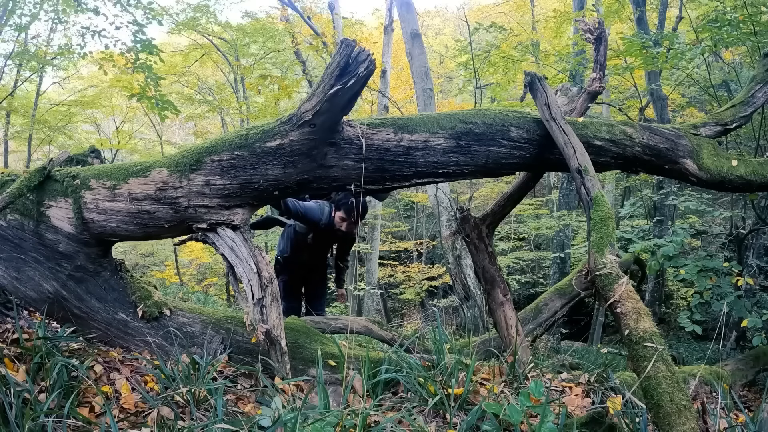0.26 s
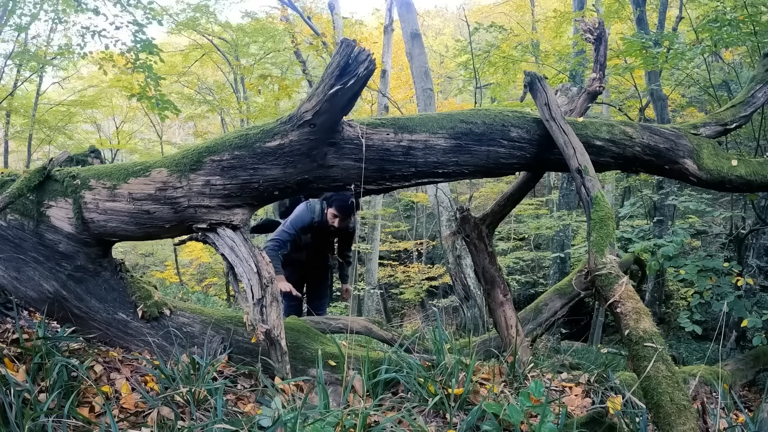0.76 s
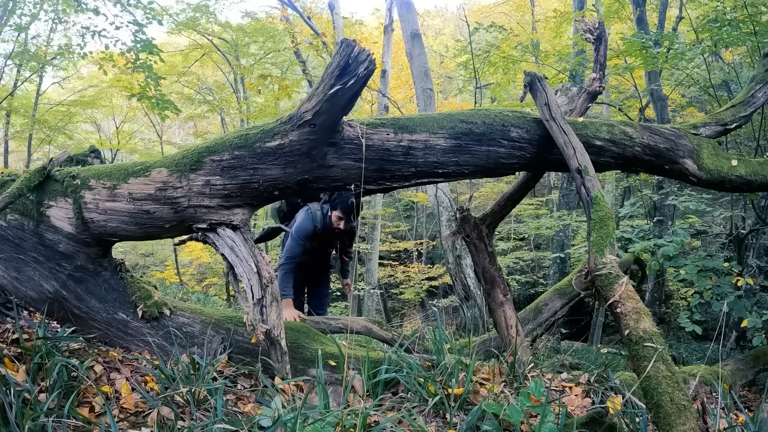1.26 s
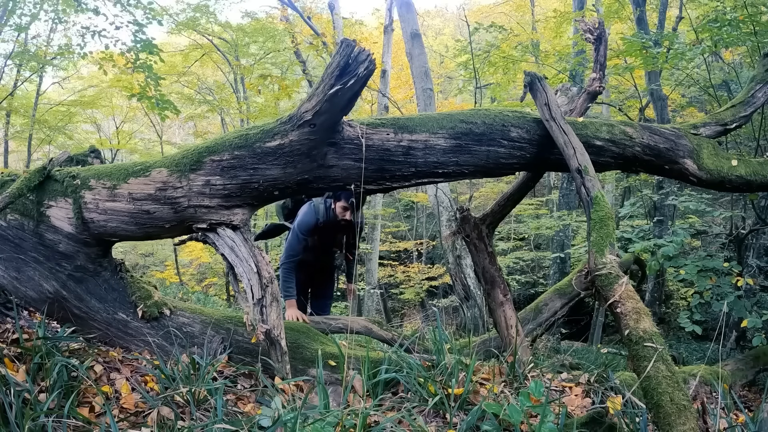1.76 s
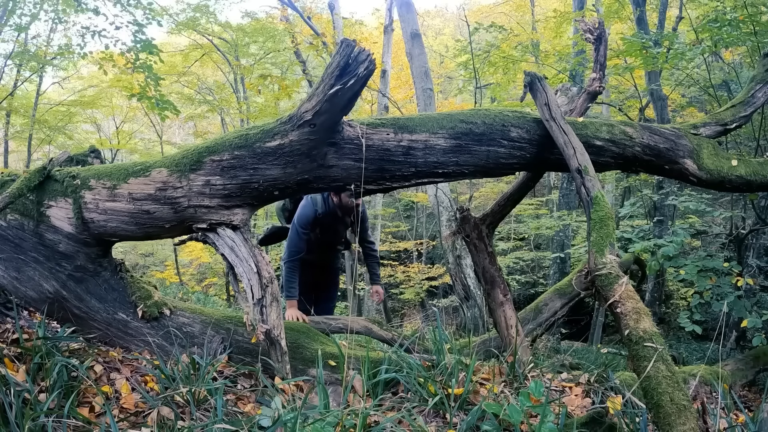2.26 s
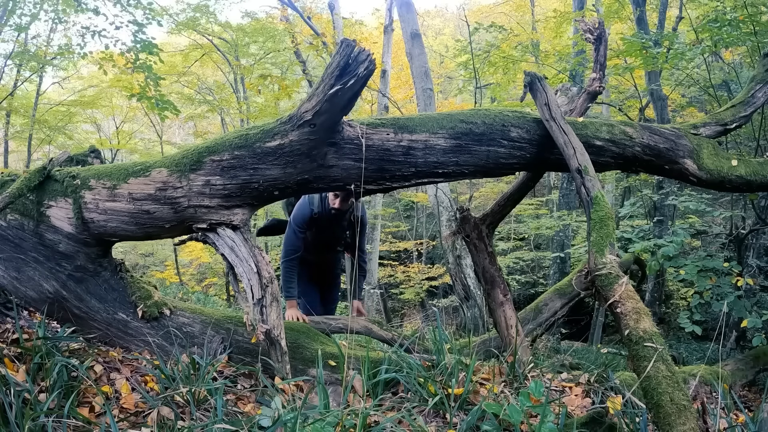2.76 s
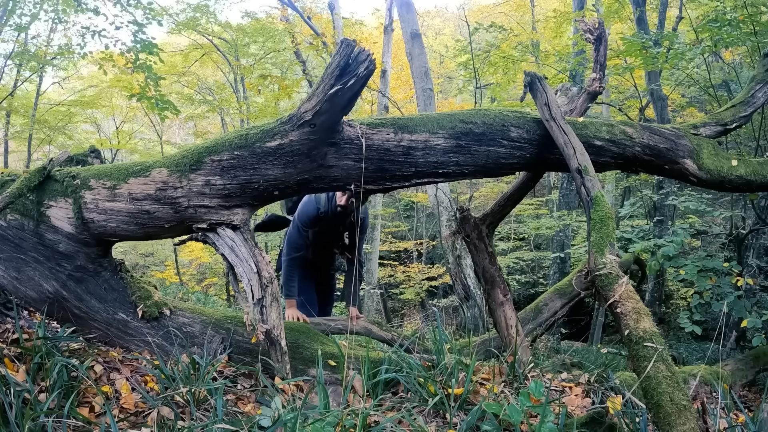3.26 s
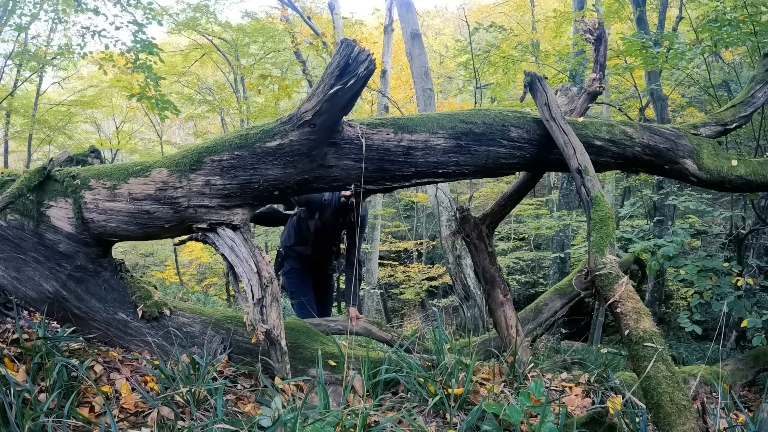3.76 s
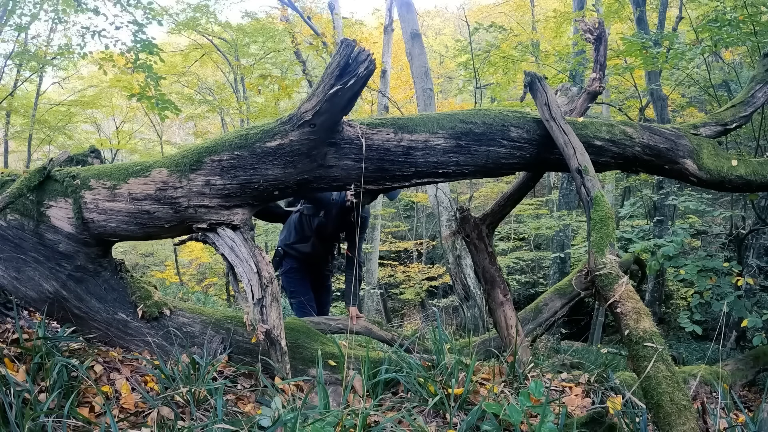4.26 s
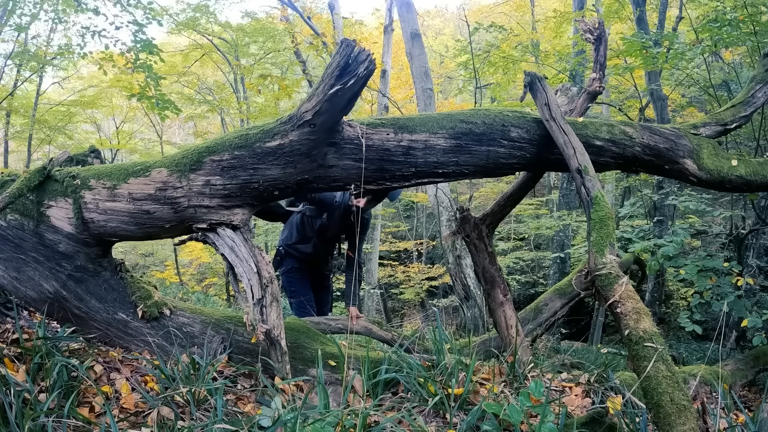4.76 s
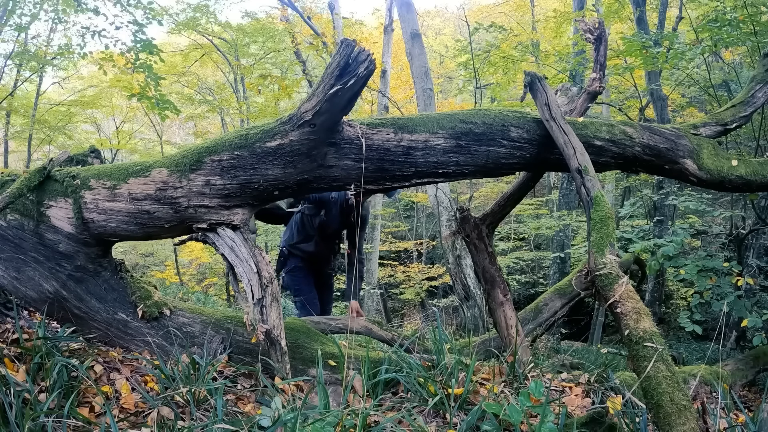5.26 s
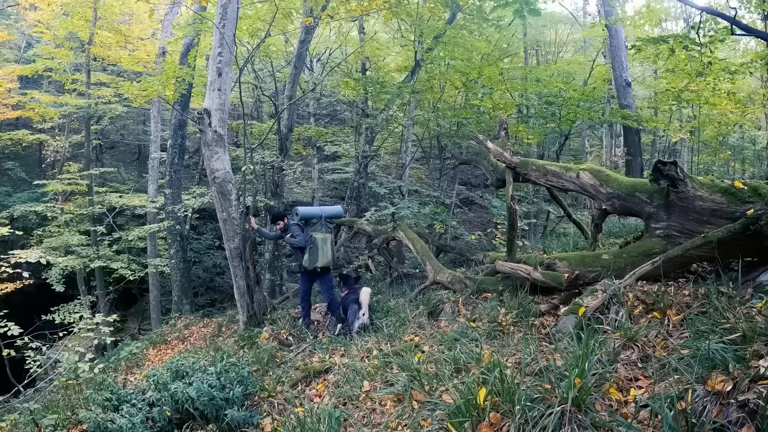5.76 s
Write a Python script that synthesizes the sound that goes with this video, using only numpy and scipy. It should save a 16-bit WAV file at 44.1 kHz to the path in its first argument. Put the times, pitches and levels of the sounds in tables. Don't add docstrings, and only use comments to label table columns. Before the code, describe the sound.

Quiet forest, stereo microphone at a small distance. A hand pats a big fallen trunk: one faint knock and two firmer ones on a stub, then rustling dry leaves and crunching steps, then four heavier, hollow slaps on the thick trunk, the last sharpest. Afterwards, more litter and twig snaps under foot as the leaf hiss rises slightly.

```python
import sys
import numpy as np
from scipy import signal
from scipy.fft import rfft, irfft, next_fast_len
from scipy.io import wavfile
from scipy.ndimage import uniform_filter1d, map_coordinates

SR = 44100
rng = np.random.default_rng(int(sys.argv[2]) if len(sys.argv) > 2 else 0)


def invert_db(level):
    return 10 ** (np.asarray(level, dtype=float) / 20)


def file_out(sig):
    cols = np.atleast_2d(sig).T
    lim = np.clip(cols, -1, 1)
    pcm = np.round(lim * 32767).astype(np.int16)
    wavfile.write(sys.argv[1], SR, pcm)


N = 264600
LEFT_RIGHT = np.array([[1], [-1]])


def unit(x):
    return x / np.sqrt(np.mean(x ** 2) + 1e-20)


def along(points, hz):
    f, v = np.transpose(points)
    return np.interp(np.log(hz + 1), np.log(f + 1), v)


def wobble(rate_hz):
    knots = rng.standard_normal(int(N * rate_hz / SR) + 4)
    return map_coordinates(knots, [np.arange(N) * rate_hz / SR])


def filtered(x, response):
    m = next_fast_len(x.shape[-1] + 8192)
    spectrum = rfft(x, m) * response(np.fft.rfftfreq(m, 1 / SR))
    return irfft(spectrum, m)[..., :x.shape[-1]]


def resonance(f, hz, width_hz):
    return 1j * f * width_hz / (hz * hz - f * f + 1j * f * width_hz)


def add(track, start_s, sound):
    part = track[..., round(start_s * SR):][..., :sound.shape[-1]]
    part += sound[..., :part.shape[-1]]


def swells(rows):
    ms = np.arange(N) / SR * 1000
    power = np.zeros(N)
    for peak_s, db, rise_ms, fall_ms in rows:
        away = np.maximum((1000 * peak_s - ms) / rise_ms, (ms - 1000 * peak_s) / fall_ms)
        power += invert_db(db - 10 * away) ** 2
    return np.sqrt(power)


def rush(spectrum, alike, patchy_db, source=None):
    if source is None:
        source = rng.standard_normal((2, N))
    z = signal.stft(source, nperseg=512)[2]
    field = uniform_filter1d(rng.standard_normal(z.shape[1:]), 6, 0)
    field = uniform_filter1d(field, 12, 1)
    pair = signal.istft(z * invert_db(patchy_db * unit(field)), nperseg=512)[1][:, :N]

    def mid_side(hz):
        turn = np.arccos(np.clip(along(alike, hz), -1, 1)) / 2
        return invert_db(along(spectrum, hz)) * [np.cos(turn), np.sin(turn)]

    mid, side = filtered(pair, mid_side)
    return unit(np.array([mid + side, mid - side]))


# time_s, leaves_db
CANOPY_WIND = [(0.0, -57.5), (0.47, -56.5), (1.3, -56), (1.6, -58), (2.4, -57), (2.9, -56), (3.6, -57),
               (4.8, -58.5), (5.23, -55), (5.45, -55.5), (6.0, -52.5)]
# frequency_hz, density_db_per_hz
LEAF_SPECTRUM = [(180, -28), (300, -14), (424, -10.5), (663, -9), (708, -8), (794, -9.5), (1240, -1),
                 (1620, -2.5), (4210, -7), (5300, -13.5), (7020, -6.5), (10300, -23), (12100, -21),
                 (14500, -39), (15500, -48)]
RUMBLE_SPECTRUM = [(65, -58), (110, -30), (131, -6.5), (150, -1.5), (237, -2), (400, -21.5), (520, -43),
                   (880, -120)]
BUFFET_SPECTRUM = [(12, -31), (20, -9), (59, -0.5), (82, -4), (110, -14), (140, -50), (240, -120)]
# frequency_hz, coherence
LEAF_COHERENCE = [(60, 0.87), (150, 0.32), (380, 0.63), (950, 0.78), (2380, 0.52), (5980, 0.79),
                  (15000, 0.27)]
# frequency_hz, left_minus_right_db
LEAF_LEAN = [(60, 3), (180, -19.5), (550, -0.5), (1650, 1), (4970, 0.5), (15000, 8.5)]
# peak_s, lift_db, rise_ms_per_10db, fall_ms_per_10db
WEIGHT_SHIFTS = [
    (.7, -5, 500, 300),
    (2.7, 0, 150, 300),
    (3.1, 4.5, 150, 200),
    (5.6, -1, 250, 250),
]


def forest():
    leaves_db = np.interp(np.arange(N) / SR, *np.transpose(CANOPY_WIND))
    leaves = invert_db(leaves_db + 1.5 + 0.69 * wobble(5.86)) * rush(LEAF_SPECTRUM, LEAF_COHERENCE, patchy_db=1.12)
    leaves = filtered(leaves, lambda hz: invert_db(along(LEAF_LEAN, hz) / 2 * LEFT_RIGHT))
    lift = 1 + swells(WEIGHT_SHIFTS)
    rumble_gain = lift * invert_db(-70 + 0.54 * wobble(1.63) + 1.5 * wobble(9))
    rumble = rumble_gain * rush(RUMBLE_SPECTRUM, [(130, 0.32), (300, 0.25)], patchy_db=2.0)
    shake = swells([(s + 0.052, db - 8.5, 53, 105) for s, db in TRUNK_BOOMS])
    buffet_gain = lift * invert_db(-79.5 + 2.2 * wobble(4.96)) + shake
    buffet = buffet_gain * rush(BUFFET_SPECTRUM, [(30, 0.71)], patchy_db=-1.6)
    return leaves + rumble + buffet


# centre_hz, width_hz, level_db
BARK_RESONANCES = [(650, 610, 1), (1710, 1020, 10), (3850, 11000, -1), (6800, 3600, -20)]
# start_s, peak_db, brightness_db, spread_ms, lead_in_touch_db
STUB_SLAPS = [
    (1.0995, -47, -10, 1.5, -49),
    (1.364, -28, -2, 1.23, -46),
    (1.589, -37, -4, 1.2, -48),
]
TRUNK_SLAPS = [
    (4.069, -25, -19, 2.2, -41),
    (4.419, -33, -2, 2.3, -51),
    (4.7314, -20.5, -2, 1.66, -40),
    (5.0995, -17, -1, 1.43, -36.5),
]


def grit(slaps, echo_db):
    touch_lead_s, echo_s, skin_top_hz = 0.0105, 0.091, 7200
    out, t = np.zeros(N), np.arange(SR // 8) / SR
    for start_s, db, bright_db, spread_ms, touch_db in slaps:
        u = t / (spread_ms / 1000)
        noise = rng.standard_normal((3, len(t))) * invert_db(1.8 * rng.standard_normal(len(t)))

        def bark(f):
            peaks = [invert_db(g + bright_db * (k > 1)) * resonance(f, hz, width)
                     for k, (hz, width, g) in enumerate(BARK_RESONANCES)]
            return sum(peaks) / (1 + 1j * f / skin_top_hz) ** 2

        crumbs = invert_db(-17.5 + bright_db / 2) * np.minimum(u, 1) * np.exp(-t / 0.016)
        scrunch = filtered((u * u * np.exp(-u) + crumbs) * noise[0], bark)
        touch = filtered(u * np.exp(-u) * noise[1], lambda f: resonance(f, 570, 710))
        echo = np.sqrt(t) * np.exp(-t / 0.0067) * noise[2]
        echo = filtered(echo, lambda f: resonance(f, 1074, 260) ** 2)
        parts = ((0, db, scrunch), (-touch_lead_s, touch_db, touch), (echo_s, echo_db, echo))
        for delay_s, level_db, part in parts:
            add(out, start_s + delay_s, invert_db(level_db) * part / np.abs(part).max())
    return out


# start_s, level_db
STUB_BOOMS = [
    (1.1003, -49),
    (1.3635, -41.5),
    (1.589, -41),
]
TRUNK_BOOMS = [
    (4.0893, -36.5),
    (4.4404, -38),
    (4.751, -40),
    (5.119, -41.5),
]
# frequency_hz, level_db, t60_s, first_swing_sign
STUB_MODES = [(50.4, -9.5, 0.641, 1), (62.4, 0.6, 0.256, 1), (73.0, -13.8, 1.0, 1), (80.5, -0.5, 0.728, 1),
              (101.7, -10.2, 0.548, -1), (110.8, 12.6, 0.195, 1), (143.1, 7.5, 0.121, -1),
              (155.3, 6.1, 0.187, -1), (173.0, 11.1, 0.142, 1), (197.8, -0.3, 0.233, -1),
              (227.8, 3.7, 0.207, -1), (245.2, 0.9, 0.143, 1), (270.2, 0.7, 0.118, -1),
              (340.7, -18.9, 0.42, -1), (375.9, -8.6, 0.194, -1)]
TRUNK_MODES = [(32.2, -17.1, 1.0, -1), (48.1, -2.4, 0.625, -1), (55.5, -20.0, 1.0, -1),
               (61.6, -2.1, 0.288, 1), (66.0, 1.6, 0.671, 1), (74.2, -1.9, 0.788, 1),
               (81.2, -3.1, 0.487, 1), (96.2, -9.2, 0.46, 1), (116.5, 5.3, 0.389, -1),
               (137.1, 5.3, 0.163, -1), (147.5, 5.7, 0.312, 1), (170.9, 5.1, 0.277, 1),
               (183.8, 4.5, 0.189, 1), (211.9, -6.3, 0.224, 1), (252.0, 1.0, 0.04, -1),
               (302.0, -4.7, 0.119, 1), (333.0, -8.9, 0.125, -1)]


def boom(times, modes, rise_s, held_s, lag_s):
    out, t = np.zeros(N), np.arange(SR // 2) / SR
    for start_s, db in times:
        ring = np.zeros(len(t))
        for hz, level, t60_s, sign in modes:
            decay = invert_db(level + rng.normal(0, 1.0) - 60 * t / t60_s)
            ring += sign * decay * np.sin(2 * np.pi * hz * t)
        damping = invert_db(-90 * np.maximum(t - held_s, 0))
        add(out, start_s, invert_db(db) * ring * np.clip(t / rise_s, 0, 1) ** 2 * damping)
    return filtered(out, lambda f: np.exp(1j * np.pi * f * lag_s * LEFT_RIGHT))


# peak_s, peak_db, pitch_hz, t60_ms
LANDINGS = [(1.1021, -38, 1250, 5.9), (1.1047, -42, 1000, 8), (1.3659, -25.5, 2400, 3.5),
            (1.3668, -29, 560, 20), (1.3689, -27, 1020, 6), (1.3662, -27, 1550, 6), (1.5904, -27, 1250, 10),
            (1.5925, -29, 1820, 8.6), (1.5914, -31.5, 510, 18), (4.0705, -27, 1880, 7.3),
            (4.0732, -24.5, 1390, 8.4), (4.073, -23, 273, 37), (4.0731, -23, 605, 17),
            (4.0754, -24, 1980, 8), (4.4216, -29, 150, 18), (4.4235, -25.5, 253, 34),
            (4.424, -30.5, 1170, 5), (4.7337, -17.5, 557, 19), (4.7333, -20, 3810, 6.1),
            (4.7337, -22.5, 866, 12), (4.7353, -23, 1560, 6), (4.7355, -27.5, 2900, 5),
            (5.101, -19.5, 4300, 4), (5.1017, -14, 2050, 9.5), (5.1017, -20.5, 695, 32),
            (5.101, -24, 533, 46), (5.102, -15.5, 1480, 13.3), (5.1026, -30.5, 262, 25),
            (5.1018, -24.5, 5700, 5)]


def contacts():
    out, t = np.zeros(N), np.arange(SR // 10) / SR
    for peak_s, db, hz, t60_ms in LANDINGS:
        lead_s = 1 / (4 * hz) + 0.0003
        build = np.sin(np.pi / 2 * np.clip(t / lead_s, 0, 1))
        decay = invert_db(-60 * np.maximum(t - lead_s, 0) / (t60_ms / 1000))
        swing = np.cos(2 * np.pi * hz * (t - lead_s)) * build * decay
        add(out, peak_s - lead_s, invert_db(db) * swing)
    return out


# frequency_hz, t60_s
SCATTER_DECAY = [(150, 0.35), (600, 0.25), (2000, .14), (8000, 0.38)]


def trees(x):
    out = np.zeros((2, N))
    for start_s, *_ in STUB_SLAPS + TRUNK_SLAPS:
        hz, t, z = signal.stft(rng.standard_normal((2, SR // 3)), SR, nperseg=128)
        decay = invert_db(-60 * t / along(SCATTER_DECAY, hz)[:, None])
        tail = signal.istft(z * decay, SR, nperseg=128)[1]
        tail = tail[0] + 0.45 * tail[1] * LEFT_RIGHT
        hit = x[None, round(start_s * SR):][:, :SR // 12]
        answer = signal.fftconvolve(hit, tail / np.linalg.norm(tail[0]), axes=1)
        add(out, start_s + 0.004, answer)
    return invert_db(-9.5) * out


def bloom():
    starts = [(s + 0.012, db) for s, db in STUB_BOOMS] + TRUNK_BOOMS
    body = unit(filtered(rng.standard_normal(N), lambda f: resonance(f, 284, 240) ** 2))
    return swells([(s, db - 4.5, 4, 26.6) for s, db in starts]) * body


# start_s, peak_db, pitch_hz,
# left_minus_right_db, length_ms
TWIG_SNAPS = [(1.2615, -37, 2510, 1.0, 2), (1.3655, -35, 10500, 5, 1), (2.3057, -39, 12200, 18, 3.1),
              (2.3594, -44.5, 7910, 18, 2.4), (2.5094, -50, 6660, 1.5, 2), (2.7146, -28.5, 12000, 20, 3.3),
              (3.0886, -26, 1930, 1, 3.6), (3.0885, -33, 5570, 3, 3), (3.2263, -37.5, 1800, 2, 4),
              (3.226, -45, 7200, 2, 3), (5.5039, -39, 7190, 5, 2.3), (5.67, -33, 3680, 1.5, 1.8),
              (5.755, -36.5, 6090, 3, 2.2), (5.7744, -45, 5590, 3.0, 2), (5.8076, -44, 3060, 11, 1.8),
              (5.834, -42, 3290, 8, 1.6), (5.8506, -31, 6540, 3, 1.9), (5.9435, -41, 2570, 3, 1.9)]


def snaps():
    out, t = np.zeros((2, N)), np.arange(SR // 16) / SR
    for start_s, db, hz, pan_db, length_ms in TWIG_SNAPS:
        u = t / (max(length_ms, 0.2) / 1000)
        shared = rng.standard_normal(len(t))
        noise = shared + 0.6 * hz / 10000 * rng.standard_normal((2, len(t)))
        ragged = noise * invert_db(0.98 * rng.standard_normal(len(t)))
        burst = np.clip(3.7 * u, 0, 1) * np.exp(-u) * ragged
        burst = filtered(burst, lambda f: resonance(f, hz, 0.97 * hz) ** 2)
        add(out, start_s, invert_db(db) * burst / np.abs(burst).max() * invert_db(pan_db / 2 * LEFT_RIGHT))
    return out


# peak_s, #
# level_db, rise_ms_per_10db, fall_ms_per_10db
BRUSH_STROKES = [
    (2.306, -61, 15, 200),
    (2.356, -59.5, 20, 124),
    (2.516, -73, 80, 50),
    (2.7, -63, 130, 100),
    (2.74, -45, 32, 90),
    (2.99, -57, 500, 32),
    (5.3, -63, 100, 2000),
]
FOOTSTEPS = [(3.054, -47.5, 45, 90), (3.086, -41.5, 16, 19), (3.218, -64, 80, 150), (3.226, -47, 9, 51),
             (3.408, -57, 20, 50), (5.564, -50.5, 85, 202), (5.676, -50.5, 150, 75), (5.764, -63, 30, 13),
             (5.846, -57, 80, 15), (5.85, -50, 2, 12), (5.998, -53.5, 190, 50)]
# frequency_hz, density_db_per_hz
BRUSH_SPECTRUM = [(1470, -27), (2500, -9), (3390, -9.5), (7340, 0.5), (8420, -8.5), (12000, -10),
                  (14300, -18), (15500, -66)]
STEP_SPECTRUM = [(240, -43), (400, -6), (821, -10), (1360, -3), (3060, -4), (5390, -8), (7320, -3.5),
                 (12100, -22), (14600, -19), (15500, -55)]


def litter(strokes, tone, alike, spiky_db, lean_db):
    sizes = invert_db(spiky_db * rng.exponential(size=N) + 1.4 * wobble(60))
    grains = rush(tone, alike, patchy_db=1.0, source=sizes * rng.standard_normal((2, N)))
    return swells(strokes) * grains * invert_db(lean_db / 2 * LEFT_RIGHT)


# start_s, peak_db, pitch_hz, length_ms
SOFT_TREADS = [
    (3.051, -50, 236, 16),
    (3.089, -48, 242, 11),
    (3.222, -54, 225, 14),
    (3.246, -59, 237, 9.3),
    (3.44, -58, 226, 13),
    (5.69, -59, 152, 15),
    (5.859, -60.5, 155, 29),
]


def treads():
    out, t = np.zeros(N), np.arange(SR // 5) / SR
    for start_s, db, hz, length_ms in SOFT_TREADS:
        u = t / (max(length_ms, 1) / 1000)
        press = u * np.exp(-u) * rng.standard_normal(len(t))
        thud = filtered(press, lambda f: resonance(f, hz, 80) ** 2)
        add(out, start_s, invert_db(db) * thud / np.abs(thud).max())
    return out


def yielding():
    grow_s, let_go_s = 0.0045, 0.0013
    out, t = np.zeros(N), np.arange(N) / SR
    for start_s, db in TRUNK_BOOMS:
        away = np.maximum((start_s - t) / grow_s, (t - start_s) / let_go_s)
        out += invert_db(db + 6.5) * np.exp(-away)
    return out


def scene():
    background = forest()
    slap = grit(STUB_SLAPS, echo_db=-61) + grit(TRUNK_SLAPS, echo_db=-45.5) + contacts()
    direct = filtered(slap, lambda f: np.exp(-1j * np.pi * f * 3e-5 * LEFT_RIGHT))
    wood = boom(STUB_BOOMS, STUB_MODES, rise_s=0.0092, held_s=0.12, lag_s=-0.00025)
    wood = wood + boom(TRUNK_BOOMS, TRUNK_MODES, rise_s=0.0011, held_s=0.26, lag_s=0.00019)
    wood = wood + bloom() + yielding()
    knocks = (direct + wood) * invert_db(0.3 * LEFT_RIGHT) + trees(slap)
    brush_alike = [(3000, 0.7), (12000, 0.44)]
    brush = litter(BRUSH_STROKES, BRUSH_SPECTRUM, brush_alike, spiky_db=1.5, lean_db=4.0)
    step_alike = [(300, 0.75), (3000, 0.71), (12000, 0.71)]
    steps = litter(FOOTSTEPS, STEP_SPECTRUM, step_alike, spiky_db=2.0, lean_db=2.0)
    return background + knocks + snaps() + brush + steps + treads()


def roll_off(x):
    return signal.sosfilt(signal.butter(12, 16310, fs=SR, output="sos"), x)


# frequency_hz, gain_db
MIC_RESPONSE = [(20, -0.5), (13000, 0.5), (14500, -14), (15200, -18), (16500, -36)]


def record(dry):
    mix = filtered(dry, lambda hz: invert_db(along(MIC_RESPONSE, hz)))
    return roll_off(mix)


dry = scene()
out = record(dry)
file_out(out)
```